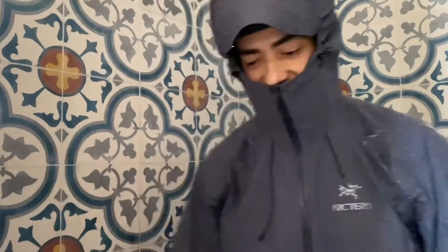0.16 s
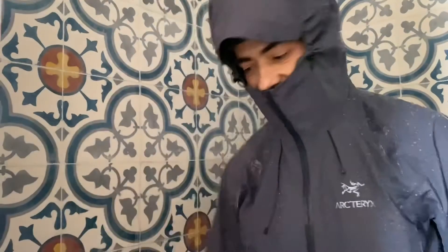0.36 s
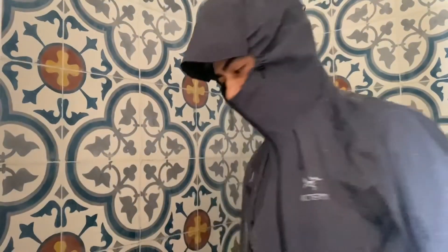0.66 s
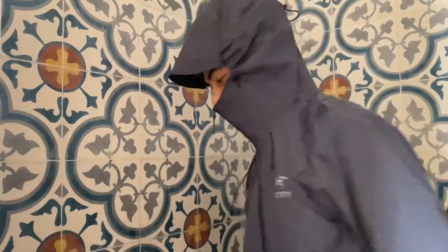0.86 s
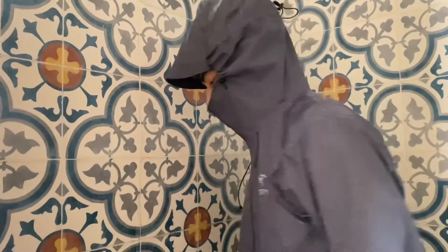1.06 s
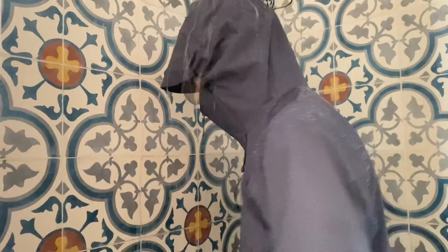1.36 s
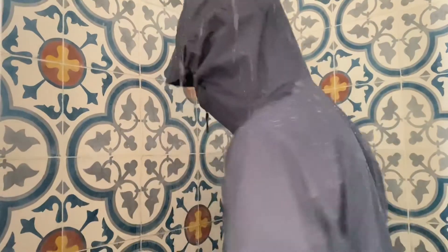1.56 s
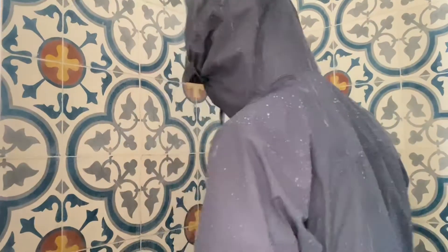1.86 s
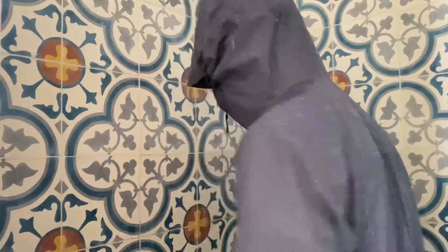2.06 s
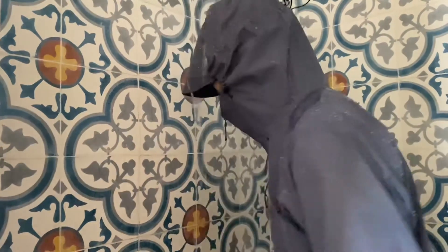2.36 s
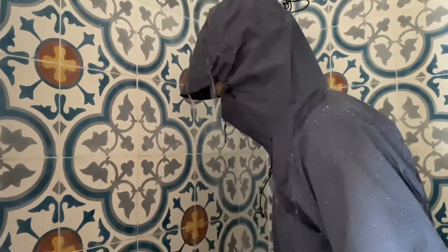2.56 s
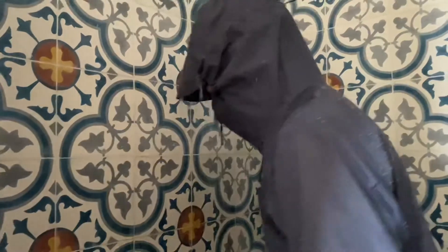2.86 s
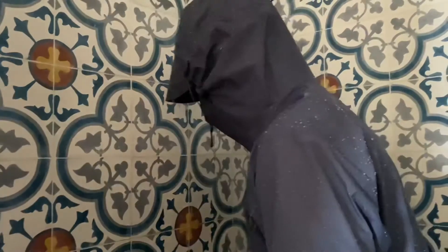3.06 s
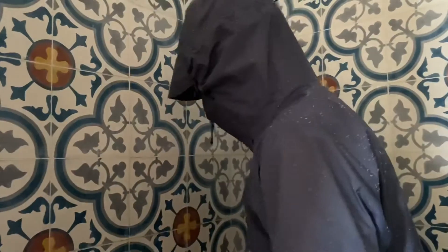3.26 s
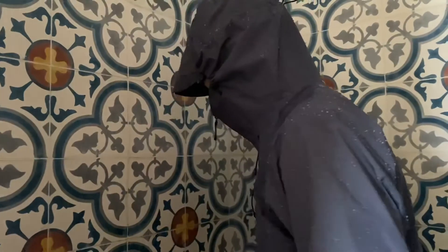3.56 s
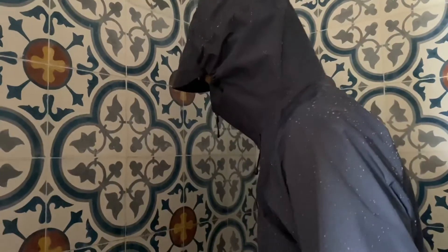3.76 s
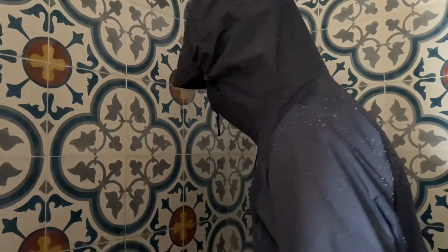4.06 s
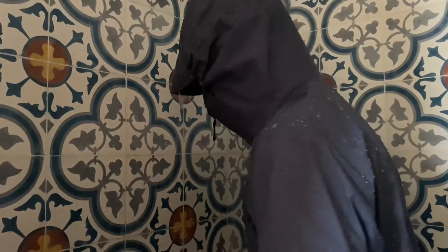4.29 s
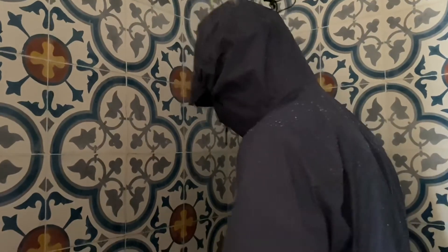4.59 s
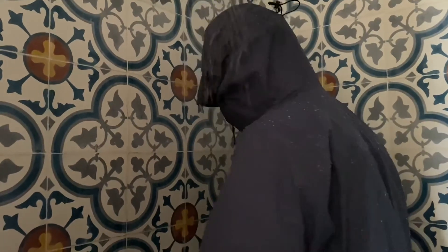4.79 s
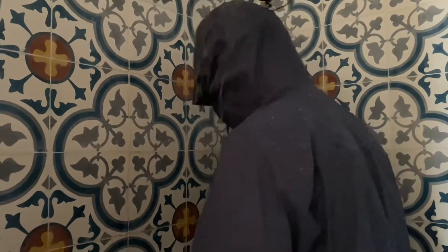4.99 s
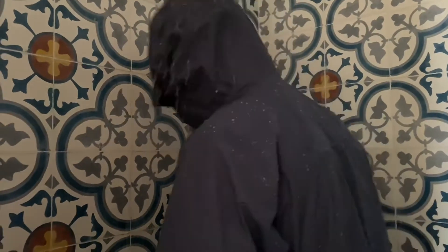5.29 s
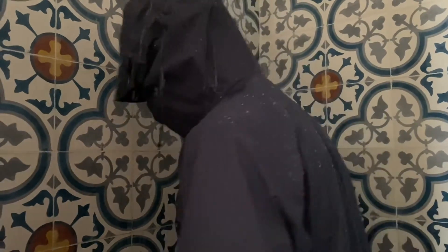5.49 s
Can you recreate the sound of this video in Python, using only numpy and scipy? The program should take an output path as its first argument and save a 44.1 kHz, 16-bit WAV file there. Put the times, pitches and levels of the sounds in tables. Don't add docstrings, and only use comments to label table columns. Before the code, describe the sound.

Close stereo capture of shower water hitting a waterproof hood and shoulders. Dense mid-pitched pattering on fabric mixes with airy spray and a soft low rumble. Droplets pop and wet slaps gather around two seconds, with dull cloth taps. The body leaves the jets at about three seconds, making it thinner and quieter; drumming resumes before four, ending in a cluster of splats.

```python
import sys
import numpy as np
from scipy import signal
from scipy.fft import rfft, irfft, next_fast_len
from scipy.io import wavfile
from scipy.ndimage import uniform_filter1d, map_coordinates

SR = 44100
rng = np.random.default_rng(int(sys.argv[2]) if len(sys.argv) > 2 else 0)


def digitize_waveform(pressure):
    field = np.atleast_2d(pressure).T
    bounded = np.clip(field, -1, 1)
    quanta = np.round(bounded * 32767).astype(np.int16)
    wavfile.write(sys.argv[1], SR, quanta)


def voltage_ratio(level):
    return 10 ** (np.asarray(level, float) / 20)


N = 248283

# start_s, force_on_cloth_db, run_off_break_up_db
FLOW = [(0.0, -41, -47.5), (0.2, -38.5, -48), (0.45, -41, -47.5), (0.8, -44.5, -45.5), (1.05, -44, -45),
        (1.35, -46.5, -47), (1.7, -44, -43), (2.1, -47.5, -45.5), (2.46, -45.5, -45.5), (2.9, -59, -41.5),
        (3.4, -60.5, -48), (3.56, -62, -51.5), (3.8, -46.5, -52), (4.3, -46.5, -49), (4.6, -44, -41.5),
        (4.8, -44, -46.5), (5.03, -43, -43), (5.63, -43, -44)]


def unit(x):
    return x / np.sqrt(np.mean(x ** 2) + 1e-20)


def along(points, hz):
    f, v = np.transpose(points)
    return np.interp(np.log(hz + 1), np.log(f + 1), v)


def curves(rows):
    s, *cols = np.transpose(rows)
    return [np.interp(np.arange(N) / SR, s, c) for c in cols]


def wobble(rate):
    knots = rng.standard_normal(int(N * rate / SR) + 4)
    return map_coordinates(knots, [np.arange(N) * rate / SR])


def filtered(x, response):
    m = next_fast_len(N + 8192)
    return irfft(rfft(x, m) * response(np.fft.rfftfreq(m, 1 / SR)), m)[..., :N]


def resonance(hz, centre_hz, width_hz):
    return 1j * hz * width_hz / (centre_hz ** 2 - hz ** 2 + 1j * hz * width_hz)


def drops(spectrum, per_second, scatter_db, smear_s, wash_db, patchy_db):
    sizes = np.minimum(rng.exponential(size=(2, N)), 3)
    hits = (rng.random((2, N)) < per_second / SR) * voltage_ratio(scatter_db * sizes)
    tail = voltage_ratio(-60 * np.arange(SR // 2) / SR / smear_s)
    loudness = np.sqrt(np.abs(signal.fftconvolve(hits ** 2, tail[None] ** 2, axes=1)[:, :N]))
    z = signal.stft(rng.standard_normal((2, N)), nperseg=512)[2]
    field = uniform_filter1d(rng.standard_normal(z.shape[1:]), size=8, axis=0)
    field = uniform_filter1d(field, size=8, axis=1)
    noise = signal.istft(z * voltage_ratio(patchy_db * unit(field)), nperseg=512)[1][:, :N]
    shower = noise * (unit(loudness) + voltage_ratio(wash_db))
    return unit(filtered(shower, lambda hz: voltage_ratio(along(spectrum, hz))))


def standing(x, share_db, t60_s):
    t = np.arange(SR // 2) / SR
    echoes = rng.standard_normal((2, len(t))) * voltage_ratio(-60 * t / t60_s)
    wet = signal.fftconvolve(x, echoes / np.linalg.norm(echoes[0]), axes=1)[:, :N]
    return (x + voltage_ratio(share_db) * wet) / np.sqrt(1 + voltage_ratio(2 * share_db))


def water():
    # pitch_hz, level_db (per Hz)
    drum_colour = [(88, -48), (150, -1), (237, -0.5), (264, -3.5), (335, -4.5), (566, -5), (892, 1.5),
                   (1600, -6), (2080, -46), (3520, -120)]
    patter_colour = [(700, -46), (1200, -14.5), (1600, -4.5), (2200, -1.5), (3000, -5), (4500, -16),
                     (7000, -26.5)]
    spray_colour = [(1500, -29.5), (2800, -2.5), (4500, 0.5), (6500, -2.5), (9000, -5), (16000, -48)]
    mist_colour = [(4000, -14), (7000, 2.5), (9000, 3), (12000, 6), (15500, 2.5), (17000, -8)]
    # pitch_hz, width_hz, level_db
    folds = [(360, 5.4, -14), (412.2, 12.4, 9), (509.6, 35, 5.5), (662, 35, -2), (736, 34, -0.5),
             (910, 13, -8), (950, 18, -4), (1100, 8.8, -32), (1319, 12.6, 9), (1344, 17, -7),
             (1464, 140, -7.5), (1870, 120, -6), (2044, 13, 2), (2190, 19, -22)]
    force_db, breakup_db = curves(FLOW)
    patter_db = force_db.mean() + 0.66 * (force_db - force_db.mean()) - 0.5 + 0.27 * wobble(6)
    mist_db = breakup_db.mean() + 1.33 * (breakup_db - breakup_db.mean()) - 2 + 2.3 * wobble(4.2)
    drum = drops(drum_colour, 400, scatter_db=10, smear_s=0.29, wash_db=12, patchy_db=2.1)
    patter = drops(patter_colour, 240, scatter_db=3.0, smear_s=0.13, wash_db=8.0, patchy_db=2.2)
    spray = drops(spray_colour, 220, scatter_db=7.5, smear_s=0.21, wash_db=3.5, patchy_db=4.0)
    mist = drops(mist_colour, 400, scatter_db=-7.0, smear_s=0.057, wash_db=-5.0, patchy_db=-2.0)

    def ringing(hz):
        return 1 + sum(voltage_ratio(db) * np.abs(resonance(hz, c, w)) ** 2 for c, w, db in folds)

    drum = unit(standing(filtered(drum, ringing), share_db=-7, t60_s=0.24))
    patter = unit(standing(filtered(patter, ringing), share_db=-7, t60_s=0.24))
    on_cloth = voltage_ratio(force_db + 1.5) * drum + voltage_ratio(patter_db + 1.0) * patter
    in_air = voltage_ratio(breakup_db - 1.0) * spray + voltage_ratio(mist_db + 0.5) * mist
    return on_cloth + in_air


def boom():
    # start_s, level_db
    swell = [(0.0, -41), (0.33, -49), (0.58, -40.5), (0.77, -43), (0.92, -35.5), (1.1, -38), (1.55, -64),
             (1.66, -53), (1.74, -42.5), (2.13, -41), (2.26, -47), (2.4, -37), (2.76, -32.5), (3.1, -40.5),
             (3.7, -34), (4.04, -35.5), (4.2, -42.5), (5.63, -44)]
    # pitch_hz, width_hz, level_db
    room_modes = [(43.3, 17, -1.5), (82.4, 12.5, 0), (94.3, 1.2, -11), (157.7, 8.1, -8.5),
                  (200.5, 7.5, -15), (231.8, 6.2, -7), (287.6, 1, -6)]
    tone_db, = curves(swell)
    force_db = curves(FLOW)[0]
    rumble_db = -45 + 0.19 * (force_db - force_db.mean()) + 1.0 * wobble(4)
    phase = 2 * np.pi * np.cumsum(53.9 + 0.91 * wobble(1.437)) / SR
    tone = unit(np.sin(phase + [[0], [1.9]]) * voltage_ratio(0.33 * wobble(6.78)))
    rumble = unit(filtered(rng.standard_normal((2, N)),
                           lambda hz: sum(voltage_ratio(db) * resonance(hz, c, w) for c, w, db in room_modes)))
    return voltage_ratio(tone_db - 2.0) * tone + voltage_ratio(rumble_db - 1.5) * rumble


def gutter():
    # pitch_hz, level_db (per Hz)
    gurgle = [(250, -17), (370, -4.5), (520, 0.5), (640, -12), (900, -38)]
    return voltage_ratio(-59) * drops(gurgle, 40, scatter_db=-3, smear_s=0.24, wash_db=0.0, patchy_db=1.5)


def landings():
    # start_s, peak_db, cavity_hz, cavity_width_octaves, fizz_share_db
    heavy = [(0.599, -21, 2340, 1, -13.5), (0.8772, -20.5, 3970, 0.76, -16), (1.2474, -25, 2600, 0.99, -6),
             (1.358, -16.5, 3860, 1, -13), (1.472, -17.5, 6400, 0.37, -16),
             (1.5412, -15, 4400, 0.73, -10.5), (1.5932, -19, 4440, 0.29, -9),
             (1.7232, -14.5, 4600, 0.71, -14), (1.99, -17.5, 4330, 0.52, -43),
             (2.1018, -20, 6850, 0.81, -6.5), (2.176, -14.5, 2660, 0.83, -14.5),
             (2.1886, -10, 6670, 0.54, -33), (2.3015, -18.5, 3500, 0.85, -9.5), (2.8444, -10, 3020, 1, -40),
             (2.9869, -19.5, 6200, .89, -10), (3.095, -19, 3400, 0.65, -15),
             (3.2117, -18.5, 3850, 0.59, -13), (4.4526, -12.5, 3080, 0.57, -17),
             (4.7402, -20, 3300, .55, -12.5), (4.7643, -17.5, 3800, 0.58, -13.5),
             (5.1527, -16, 4800, 0.67, -12), (5.3384, -19, 3150, 0.46, -12),
             (5.3621, -12.5, 4300, 1, -14.5), (5.414, -10.5, 4000, 0.51, -19)]
    # start_s, peak_db, cavity_hz, fizz_share_db
    drips = [(0.079, -28, 5940, -15), (0.625, -23.5, 6300, -10), (0.6978, -24.5, 4500, -24),
             (0.7323, -29.5, 2620, -2), (0.7875, -29, 6300, -7), (0.9562, -24.5, 3830, -2.5),
             (1.1044, -25, 5270, -29), (1.1177, -30.5, 4650, 3.5), (1.782, -25.5, 6800, -27),
             (1.8564, -26, 5000, -4.5), (1.9094, -24.5, 2030, -32), (2.3837, -25, 7100, -4.5),
             (2.4097, -28, 6700, 0), (2.5741, -25.5, 1660, -5), (2.6819, -27, 6800, -7),
             (2.823, -34, 6460, -22), (3.0495, -26.5, 6340, -5), (3.1848, -25.5, 6250, -5),
             (3.2784, -25.5, 6840, -5), (3.3074, -28, 5260, -22), (3.679, -35, 6250, -6),
             (3.744, -27.5, 6980, -8), (3.8382, -32.5, 3000, -14), (4.0484, -29.5, 2550, -12),
             (4.422, -28, 7260, -7), (4.5998, -24, 4900, -6.5), (4.966, -22.5, 6500, -7),
             (5.2394, -31, 5750, -2), (5.2576, -22.5, 4930, -14), (5.326, -22.5, 6400, -13)]
    # start_s, peak_db, cavity_hz, edge_share_db
    spits = [(0.201, -27, 10900, -20), (0.2151, -18, 10900, -3), (0.3378, -18.5, 11800, -6.5),
             (0.6815, -24.5, 11900, -31), (0.861, -31, 15300, -17), (0.998, -20, 9700, -13),
             (1.1907, -30, 9900, -29), (1.3362, -24.5, 10600, -4), (2.031, -17.5, 9500, -7),
             (2.4857, -32.5, 11400, -23), (2.538, -26, 14400, -1), (2.6528, -16.5, 11800, -2),
             (2.7616, -31, 11500, -16), (2.9666, -25, 11800, -10), (3.353, -16, 12100, -15),
             (4.0983, -32.5, 11000, -7), (4.3693, -33, 11500, -18), (4.563, -24.5, 15400, -32),
             (4.6565, -32, 9000, -10), (4.894, -31.5, 10500, -21), (4.7113, -27, 15200, -3),
             (5.013, -25, 10700, 4), (5.073, -23.5, 10700, -12)]
    return ([(s, db, hz, octaves, -5.5 + 0.22 * fizz, fizz) for s, db, hz, octaves, fizz in heavy]
            + [(s, db, hz, 0.65, -3.5, fizz) for s, db, hz, fizz in drips]
            + [(s, db, hz, 0.69, edge, -9) for s, db, hz, edge in spits])


def splats():
    # pitch_hz, t60_s
    tiles = [(1000, 0.28), (2500, 0.23), (5000, 0.27), (9000, 0.4), (15000, 0.25)]
    out, size = np.zeros((2, N + SR)), 16384
    hz, t = np.fft.rfftfreq(size, 1 / SR), np.arange(size) / SR

    def hump(centre_hz, octaves):
        distance = np.abs(np.log2((hz + 1) / centre_hz) / np.clip(octaves, .2, 2))
        return voltage_ratio(-9 * distance ** 1.8)

    for s, db, cavity_hz, octaves, edge_db, fizz_db in landings():
        grid, frames, z = signal.stft(rng.standard_normal((2, size)), SR, nperseg=256)
        fade = voltage_ratio(-60 * frames / along(tiles, grid)[:, None])
        tail = signal.istft(z * fade, SR, nperseg=256)[1][:, :size]
        slap = voltage_ratio(3.0 - 60 * t / 0.0034) * rng.standard_normal(size) * [[1], [.3]]
        cavity = hump(cavity_hz, octaves) ** 2 * 3000 / (cavity_hz * octaves)
        edge = voltage_ratio(2 * edge_db - 6.0) * hump(4800, 1.0) ** 2
        fizz = voltage_ratio(2 * fizz_db + 5.5) * hump(11000, 0.97) ** 2
        colour = np.sqrt(cavity + edge + fizz)
        colour *= voltage_ratio(1.5 * np.interp(hz / 700, np.arange(40), rng.standard_normal(40)))
        spatter = voltage_ratio(1.2 * np.interp(t / 0.0013, np.arange(200), rng.standard_normal(200)))
        click = voltage_ratio(21.5 + 0.33 * db) * (t == t[32]) * [[1], [.4]]
        burst = tail * spatter * (1 + 0.25 * voltage_ratio(-60 * t / 0.24)) + slap + click
        splat = irfft(rfft(burst) * colour, size) * (t < .35)
        out[:, round(s * SR):][:, :size] += voltage_ratio(db - 4.5) * splat
    return out[:, :N]


def panels():
    # start_s, length_s, level_db, from_hz, to_hz
    crossings = [
        (0.1, 0.55, -45, 1000, 1618),
        (1.578, 0.16, -42.5, 850, 448),
        (3.4, .08, -48.5, 477, 566),
        (3.415, 0.073, -51.5, 950, 950),
        (3.727, 0.71, -50, 1370, 1390),
        (3.699, 0.7, -49.5, 2115, 2060),
        (4.619, 0.16, -49, 1303, 1278),
        (4.948, 0.26, -43, 779, 717),
    ]
    out = np.zeros((2, N + SR))
    for s, length_s, db, from_hz, to_hz in crossings:
        u = np.arange(round(length_s * SR)) / SR / length_s
        blur = 0.15 + 0.048 / length_s
        span = round(SR / (blur * np.sqrt(from_hz * to_hz)))
        sway = uniform_filter1d(rng.standard_normal((2, 2, SR)), size=span)
        sway = uniform_filter1d(sway, size=span)[..., :len(u)]
        phase = 2 * np.pi * np.cumsum(from_hz * (to_hz / from_hz) ** u) / SR
        note = unit(sway[0] * np.sin(phase) + sway[1] * np.cos(phase))
        out[:, round(s * SR):][:, :len(u)] += voltage_ratio(db) * np.sqrt(np.sin(np.pi * u)) * note
    return out[:, :N]


def taps():
    # start_s, peak_db, thud_hz, t60_s
    thuds = [(1.138, -65, 662, 0.3), (1.658, -42, 484, 0.25), (2.33, -35.5, 883, 0.28),
             (2.379, -43.5, 910, 0.37), (2.571, -37, 400, 0.29), (2.68, -33.5, 487, 0.22),
             (4.673, -37.5, 536, 0.31), (4.736, -30.5, 1200, 0.32), (5.079, -36.5, 720, 0.21),
             (5.119, -35, 680, 0.29), (5.488, -34.5, 662, 0.34)]
    out, t = np.zeros((2, N + SR)), np.arange(SR // 4) / SR
    hz = np.fft.rfftfreq(len(t), 1 / SR)
    for s, db, thud_hz, t60_s in thuds:
        puff = rng.standard_normal((2, len(t))) * voltage_ratio(-60 * t / t60_s) * (1 - np.exp(-t / 0.0011))
        thud = irfft(rfft(puff) * resonance(hz, thud_hz, 0.61 * thud_hz), len(t))
        out[:, round(s * SR):][:, :len(t)] += voltage_ratio(db + 13.5) * thud / np.sqrt(thud_hz / 700)
    return out[:, :N]


def ports(pair):
    # pitch_hz, likeness (0 to 1)
    alike = [(60, 0.92), (130, 0.92), (290, 0.95), (640, 0.061), (1400, 0.15), (3100, 0.47), (5500, 0.23),
             (6700, .84), (8500, .88), (15000, .88)]
    # pitch_hz, left_minus_right_db
    lean = [(40, 0.3), (200, -3), (400, -5), (700, 1.5), (3000, 1.6), (6000, 1.5), (9000, -0.5)]
    side = np.array([[1], [-1]])

    def blend(hz):
        turn = np.arccos(np.clip(along(alike, hz), -1, 1)) / 2
        return np.array([np.cos(turn), np.sin(turn)])

    def balance_and_delay(hz):
        lag = np.pi * np.maximum(hz - 6890, 0) / 4134
        return voltage_ratio(side * along(lean, hz) / 2) * np.exp(-1j * side * lag)

    shared, apart = filtered(pair, blend)
    return filtered(shared + side * apart, balance_and_delay)


def scene():
    return ports(water() + boom() + gutter() + splats() + panels() + taps())


def joint_stereo(x, weak_db, attack_db):
    band_starts = np.r_[132, 144, 160, 176, 196, 216, 240, 264, 292, 320:673:32]
    lead, top_hz = 103, 15950
    sine = np.sin(np.pi * (np.arange(2048) + .5) / 2048)
    pair = np.pad(np.array([x[0] + x[1], x[0] - x[1]]) / 2, ((0, 0), (lead, 0)))
    hz, _, z = signal.stft(pair, SR, window=sine, nperseg=2048)
    below_top = (hz < top_hz)[:, None]
    power = np.add.reduceat(np.abs(z) ** 2 * below_top, band_starts, axis=1)
    strong = power > voltage_ratio(2 * weak_db) * power[::-1]
    band = np.clip(np.searchsorted(band_starts, np.arange(len(hz)), "right") - 1, 0, None)
    edges = np.pad(np.diff(pair, axis=1) ** 2, ((0, 0), (512, 1024))).sum(axis=0)
    blocks = edges[:z.shape[2] * 1024].reshape(-1, 128).sum(axis=1)
    before = np.roll(uniform_filter1d(blocks, size=8), 5)
    sudden = blocks > voltage_ratio(2 * attack_db) * before
    spared = sudden.reshape(-1, 8).any(axis=1)
    kept = (strong[:, band] | (hz < 2800)[:, None] | spared) & below_top
    mid, side = signal.istft(z * kept, SR, window=sine, nperseg=2048)[1][:, lead:lead + N]
    flash = uniform_filter1d(np.repeat(sudden * 1., 128)[512 + lead:][:N], size=200)
    lost_top = filtered(x, lambda hz: hz > top_hz)
    return np.array([mid + side, mid - side]) + voltage_ratio(-26) * flash * lost_top


def top_cut(x):
    return signal.sosfilt(signal.butter(12, 16990, fs=SR, output="sos"), x)


def record(dry):
    mix = joint_stereo(dry, weak_db=-6.2, attack_db=10)
    return top_cut(mix)


dry = scene()
out = record(dry)
digitize_waveform(out)
```